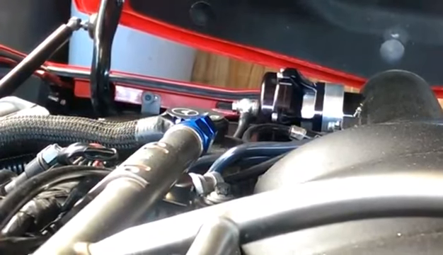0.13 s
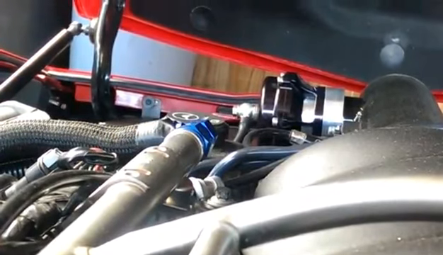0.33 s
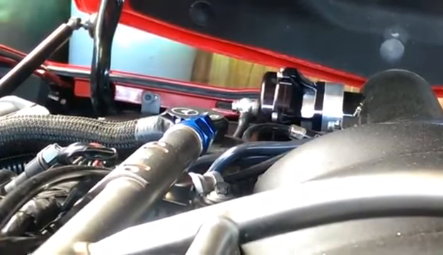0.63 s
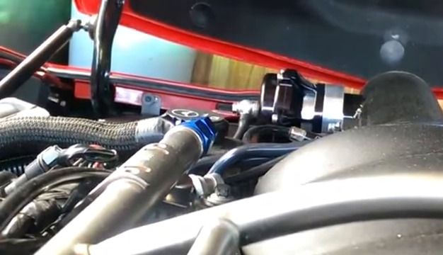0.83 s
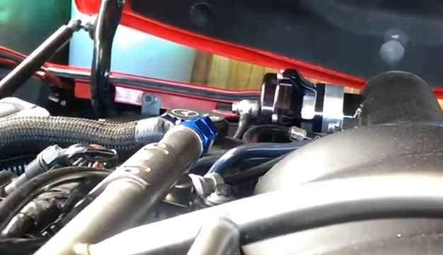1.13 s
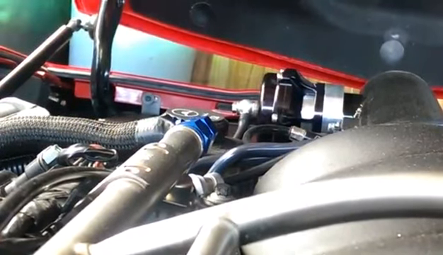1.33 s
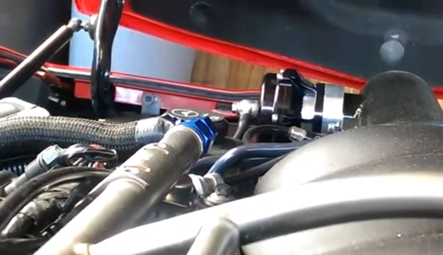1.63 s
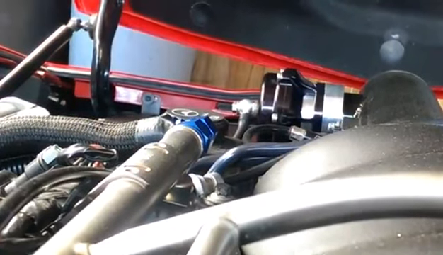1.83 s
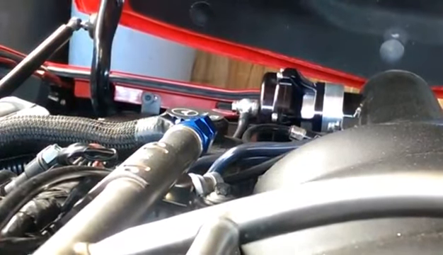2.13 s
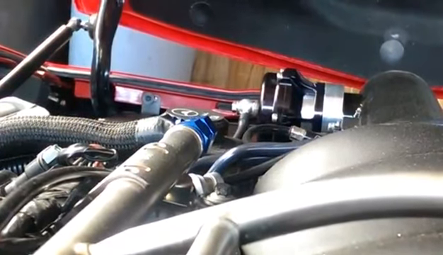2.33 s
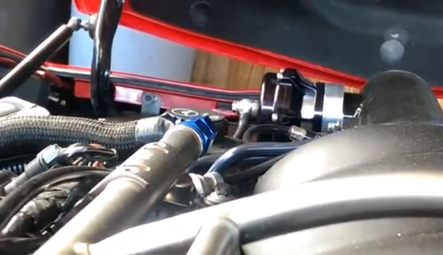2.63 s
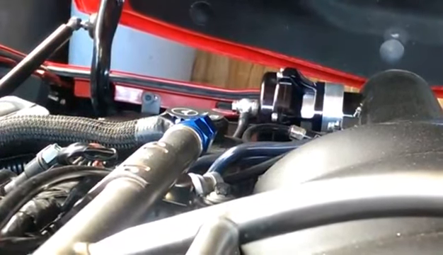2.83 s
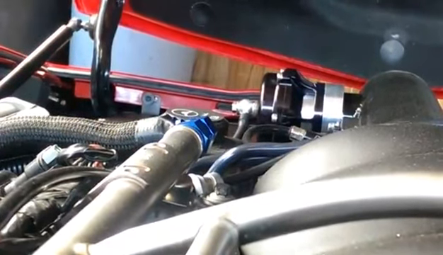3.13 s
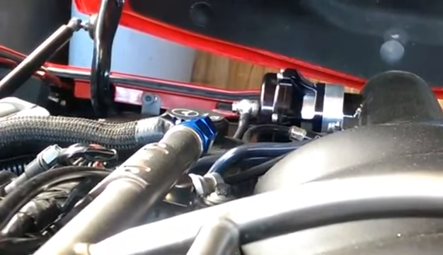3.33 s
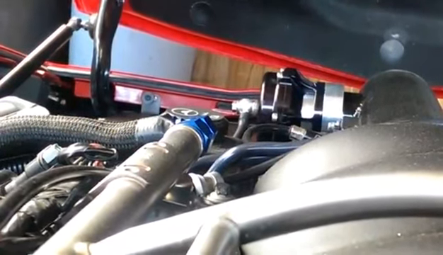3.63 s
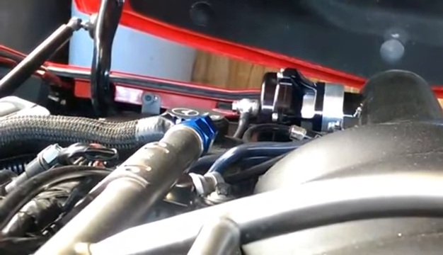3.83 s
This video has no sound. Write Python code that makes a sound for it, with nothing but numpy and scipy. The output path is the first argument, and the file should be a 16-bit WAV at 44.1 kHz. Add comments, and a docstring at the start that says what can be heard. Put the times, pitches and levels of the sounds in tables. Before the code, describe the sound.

Close stereo phone under a raised hood: car engine start-up. Quiet ticks and thuds, then the starter slams in, groaning in pulses with whir and squeal, before booming exhaust fires, sags and climbs, with short garage echo.

```python
"""A starter motor cranks under a raised hood: its gear groans as each compression slows it, and metal grinds.
The engine catches, stumbles, catches again and revs: firing pulses boom in the exhaust and ring its pipes.
A panel squeals near 2.9 kHz in noise and sine bursts, and struck modes make the knocks, jingle and relay click
before the crank. A stereo phone lies among the pipes, close to it all, in a quiet garage of noise and echo."""
import sys
import numpy as np
from scipy import signal
from scipy.fft import rfft, irfft
from scipy.io import wavfile
from scipy.ndimage import uniform_filter1d

SR = 44100
rng = np.random.default_rng(int(sys.argv[2]) if len(sys.argv) > 2 else 0)


def persist_wave(psi):
    """Save psi, clipped to +-1, as 16-bit WAV."""
    counts = np.round(np.clip(psi, -1, 1) * 32767).astype(np.int16)
    wavfile.write(sys.argv[1], SR, np.atleast_2d(counts).T)


N = 176400
T = np.arange(N) / SR
OVERTONE_CHATTER_DB = 3.5  # shared by the gear overtones and the whir


def undb(db):
    """Amplitude factor of a level in dB."""
    return 10 ** (np.asarray(db) / 20)


def unit(x):
    """Scale to an RMS of 1."""
    return x / np.sqrt(np.mean(x ** 2) + 1e-30)


def noise():
    """One channel of white noise."""
    return rng.standard_normal(N)


def curve(table, column):
    """One column drawn as straight lines over time, holding its end values."""
    points = np.array(table)
    return np.interp(T, points[:, 0], points[:, column])


def gate(table):
    """Fade in at the table's first time and out around its last."""
    fade_in = np.clip((T - table[0][0]) / 0.0067, 0, 1)
    fade_out = np.clip((table[-1][0] + .02 - T) / 0.023, 0, 1)
    return fade_in * fade_out


def shape(x, table, ends=True):
    """Filter by (pitch_hz, gain_db) points; ends closes the band outside them."""
    hz, points = np.fft.rfftfreq(N, 1 / SR) + 1, np.array(table)
    gain = undb(np.interp(np.log(hz), np.log(points[:, 0] + 1), points[:, 1]))
    if ends:
        gain = gain / (1 + (points[0, 0] / hz) ** 6) / (1 + (hz / points[-1, 0]) ** 6)
    return irfft(rfft(x) * gain, N)


def reso(x, hz, width_hz):
    """A single resonance, as of a struck or blown part."""
    return signal.lfilter(*signal.iirpeak(hz, hz / width_hz, fs=SR), x)


def modes_noise(x, modes):
    """Sum resonances of x from (pitch_hz, width_hz, level_db) rows."""
    return sum(undb(db) * unit(reso(x, hz, width)) for hz, width, db in modes)


def walk(rate):
    """Random levels held 1 / rate s and smoothed twice; spread near 1."""
    k = int(SR / rate)
    held = np.repeat(rng.standard_normal(N // k + 1), k)
    return 1.28 * uniform_filter1d(uniform_filter1d(held, k), k)[:N]


def grains(rate, spread_db):
    """Sparse random ticks of unequal size, rate per second."""
    ticks = (rng.random(N) < rate / SR) * noise()
    return ticks * undb(spread_db * np.minimum(rng.exponential(size=N), 2))


def ring(start_s, hz, t60):
    """A sine struck at start_s that falls 60 dB in t60 seconds."""
    u = np.maximum(T - start_s, 0)
    return np.sin(2 * np.pi * hz * u) * np.exp(-np.log(1000) * u / t60)


def modes_ring(start_s, modes):
    """Strike (pitch_hz, level_db, t60_s) rows together."""
    return sum(undb(db) * ring(start_s, hz, t60) for hz, db, t60 in modes)


def pan(x, db):
    """Place a source in stereo, left against right in dB; negative leans right."""
    return x * undb(np.array([[db], [-db]]) / 2)


# stereo width, side against mid: pitch_hz, gain_db
WIDTH_GAINS = [(60, -8), (200, -22), (700, -4), (1300, 1), (2400, -3), (8000, 0)]
# stereo balance, left against right: pitch_hz, gain_db
LEAN_GAINS = [(100, 0.5), (400, -2.5), (1300, -1), (4400, -5.5), (8000, -2.5), (13000, -0.5)]


def spread(make):
    """Mid and unrelated side versions of a noisy source, wide and leaning as the phone hears the bay."""
    mid, side = make(), shape(make(), WIDTH_GAINS, False)
    left_lean = [(hz, db / 2) for hz, db in LEAN_GAINS]
    right_lean = [(hz, -db) for hz, db in left_lean]
    return np.array([shape(mid + side, left_lean, False), shape(mid - side, right_lean, False)])


# span of the cranking shudder, first and last row: time_s
CRANK_SPAN = [(1.56,), (2.95,)]
# gear groans as a compression slows the crank:
# start_s, slowest_s, end_s, lowest_tooth_rate_hz, level_db, half_rate_level_db
GEAR_GROANS = [(1.55, 1.545, 1.615, 175, -33, -50), (1.81, 1.9, 1.91, 250, -33, -44),
               (2.04, 2.11, 2.17, 255, -42, -36), (2.21, 2.295, 2.375, 222, -26, -39),
               (2.485, 2.565, 2.62, 236, -26, -38), (2.71, 2.79, 2.79, 355, -30, -52),
               (2.785, 2.86, 2.885, 245, -31, -52)]
# overtones of the tooth rate from the second up, against the fundamental: level_db
MESH_OVERTONES = [-13, -13, -14, -18, -14, -20]
MESH_ROUGH = 0.22  # depth of the random swell
GROAN_BEND_HZ_S2, GROAN_EDGE_S = 11000, .025
RUMBLE_DB = -49  # centre of a wandering level
LURCH_S, LURCH_HZ, LURCH_DB, LURCH_T60_S = 1.705, 51, -33, 0.96


def starter():
    """Teeth groan at the mesh rate, dipping in compressions; alternate teeth add a half-rate line."""
    # low shudder of the car while it cranks
    out = undb(RUMBLE_DB + 3.7 * walk(17)) * unit(reso(noise(), 120, 85)) * gate(CRANK_SPAN)
    # the engine block rocks as the crank breaks loose
    out += undb(LURCH_DB) * ring(LURCH_S, LURCH_HZ, LURCH_T60_S) * (1 + 0.51 * walk(28.7))
    wobble, rough = 1 + 0.015 * walk(60), 1 + MESH_ROUGH * walk(70)
    chatter = [OVERTONE_CHATTER_DB * walk(35) for _ in MESH_OVERTONES]
    for start, slowest, end, lowest_hz, db, half_db in GEAR_GROANS:
        tooth_hz = lowest_hz + GROAN_BEND_HZ_S2 * np.clip(T - slowest, -.2, .2) ** 2
        turn = 2 * np.pi * np.cumsum(tooth_hz * wobble) / SR
        tone = np.sin(turn)
        for k, overtone_db in enumerate(MESH_OVERTONES):
            tone = tone + undb(overtone_db + chatter[k]) * np.sin((k + 2) * turn)
        env = np.clip(np.minimum(T - start, end - T) / GROAN_EDGE_S, 0, 1)
        teeth = undb(db) * tone + undb(half_db) * np.sin(turn / 2)
        out += np.sqrt(2) * env * rough * teeth
    return out


LINE_WOBBLE, LINE_CHATTER_DB = .018, 4.5  # pitch spread as a fraction, level spread


def glide(table, multiple=1):
    """A wavering, chattering tone along (time_s, pitch_hz, level_db) rows."""
    hz = multiple * curve(table, 1) * (1 + LINE_WOBBLE * walk(120))
    turn = 2 * np.pi * np.cumsum(hz) / SR
    level = undb(curve(table, 2) + LINE_CHATTER_DB * walk(70))
    return np.sqrt(2) * np.sin(turn) * level * gate(table)


# whir of the starter's armature, sagging under each compression: time_s, pitch_hz, level_db
WHIR_LINE = [(1.8, 1750, -48), (1.85, 1640, -39), (1.89, 1310, -36), (1.95, 1020, -35), (2.0, 950, -45),
             (2.12, 1600, -45), (2.16, 1530, -35), (2.21, 1400, -40), (2.28, 1290, -36), (2.38, 1340, -40),
             (2.44, 1640, -36), (2.54, 1440, -35), (2.62, 1320, -52), (2.72, 2050, -40), (2.8, 1600, -37),
             (2.88, 1300, -42)]
# tones of the whir: pitch_multiple, relative_level_db
WHIR_TONES = [(.5, -3.5), (.62, -6.5), (.8, -10.5), (1, -1), (1.2, -9)]


def starter_whir():
    """The armature sings several partials that follow one sagging pitch."""
    return sum(undb(db + OVERTONE_CHATTER_DB * walk(12)) * 1.2 * glide(WHIR_LINE, multiple)
               for multiple, db in WHIR_TONES)


# engine: time_s, firing_rate_hz, exhaust_db, pipe_ring_db, upper_pipe_ring_db
ENGINE_COURSE = [(2.955, 56.22, -36, -50, -50), (2.975, 57.2, -25, -60, -53),
                 (3.005, 57.85, -29.5, -32, -55), (3.04, 58.33, -9.5, -25, -49),
                 (3.07, 58.5, -26, -25.5, -48), (3.1, 61.27, -13.5, -28, -48), (3.156, 63.85, -7, -25, -31),
                 (3.195, 64.05, -15.5, -28, -39), (3.245, 64.2, -22.5, -35.5, -34),
                 (3.29, 63, -45, -25, -49), (3.364, 60.84, -24.5, -37, -31.5),
                 (3.42, 62.3, -21, -37.5, -34.5), (3.49, 62.28, -24, -27, -33),
                 (3.554, 59.24, -21, -42, -34), (3.585, 57.24, -16.5, -39, -52),
                 (3.628, 57.62, -11.5, -25.5, -41), (3.686, 61.55, -15, -32.5, -41),
                 (3.732, 71.34, -18.5, -23.5, -34.5), (3.782, 73.34, -12.5, -30, -33),
                 (3.824, 73.37, -19, -12.5, -40), (3.86, 75.16, -17, -31, -25), (3.9, 81.57, -15, -27, -30),
                 (3.934, 82.8, -17, -24, -33), (4.0, 83.84, -13, -22.5, -24)]
# exhaust resonances: pitch_hz, width_hz, relative_level_db
EXHAUST_MODES = [(360, 44, -19), (438, 38, -16), (107, 29, -10.5)]
# exhaust boom: multiple_of_firing_rate, relative_level_db
BOOM_ORDERS = [(1, 4), (1.5, -3), (2, -3.5), (2.5, -15.5), (3, -12.5), (4, -21), (5, -26)]
ORDER_WANDER_DB = 2.5  # at the firing rate; grows with the root of the multiple
FIRE_JITTER, FIRE_SCATTER_DB = .02, 7  # spread of firing rate (fraction) and of pulse size
PIPE_HZ, PIPE_WIDTH_HZ, PIPE_SCATTER = 245, 45, .7  # scatter: exponent evening the pulse sizes
UPPER_PIPE_HZ, UPPER_PIPE_WIDTH_HZ = 594, 32


def engine():
    """Uneven firing pulses boom in the exhaust and ring its pipes; also returns the cycle count."""
    rate = curve(ENGINE_COURSE, 1)
    cycles = np.cumsum(rate * (1 + FIRE_JITTER * walk(30))) / SR
    hits = np.flatnonzero(np.diff(np.floor(cycles)))
    pulses = np.zeros(N)
    pulses[hits] = undb(FIRE_SCATTER_DB * rng.standard_normal(N // 200)[:len(hits)])
    pulses /= np.sqrt(rate / 65)  # evens the power as firings crowd together
    boom = sum(undb(db) * unit(reso(reso(pulses, hz, width), hz, 2 * width))
               for hz, width, db in EXHAUST_MODES)
    for k, db in BOOM_ORDERS:
        level = undb(db + ORDER_WANDER_DB * np.sqrt(k) * walk(24.99))
        boom += level * np.cos(2 * np.pi * k * cycles)
    rough = pulses ** PIPE_SCATTER + 0.036 * noise()
    pipe = unit(reso(reso(rough, PIPE_HZ, PIPE_WIDTH_HZ), PIPE_HZ, 120))
    upper = unit(reso(reso(rough, UPPER_PIPE_HZ, UPPER_PIPE_WIDTH_HZ), UPPER_PIPE_HZ, 180))
    out = sum(x * undb(curve(ENGINE_COURSE, column)) for column, x in ((2, unit(boom)), (3, pipe), (4, upper)))
    return out * gate(ENGINE_COURSE), cycles


# whine that climbs with engine speed, one list per surge: time_s, pitch_hz, level_db
WHINE_SURGES = [
    [(3.06, 2200, -30), (3.085, 2700, -30), (3.12, 3050, -26), (3.14, 3450, -34.5), (3.17, 3660, -45)],
    [(3.62, 2950, -42), (3.665, 3220, -31), (3.715, 3430, -31), (3.76, 3560, -34), (3.81, 3780, -35),
     (3.85, 3920, -35), (3.88, 4090, -31), (3.93, 4240, -33), (3.99, 4480, -25)],
]


def engine_whine():
    """One climbing tone for each surge of the engine."""
    return sum(glide(surge) for surge in WHINE_SURGES)


# running gear: time_s, grind_db, upper_grind_db, air_hiss_db
RUN_LEVELS = [(1.52, -34, -26, -52), (1.54, -31, -29.5, -42), (1.59, -29, -36, -57),
              (1.64, -34.5, -39.5, -65), (1.83, -26, -30, -48), (1.99, -31, -35.5, -66),
              (2.14, -27, -27.5, -48.5), (2.32, -28.5, -31.5, -63), (2.42, -28.5, -29, -50.5),
              (2.5, -25.5, -27, -55), (2.54, -27.5, -32, -60), (2.68, -29, -32, -48.5),
              (2.73, -26, -27.5, -53), (2.79, -27.5, -29, -51), (2.96, -29.5, -27.5, -47),
              (3.03, -26, -25.5, -30), (3.16, -27.5, -32, -37.5), (3.3, -33.5, -38, -50.5),
              (3.5, -25, -30, -42.5), (3.59, -31, -33.5, -41), (4.0, -24.5, -26, -33.5)]
# colour of the grind: pitch_hz, gain_db
GRIND_COLOUR = [(150, -3), (240, 1.5), (600, -3), (1400, -5.5), (2000, -7), (3000, 0)]
# colour of the upper grind: pitch_hz, gain_db
UPPER_COLOUR = [(2600, -3.5), (3400, -3), (4200, 2.5), (5000, -2.5), (5500, -8), (8000, -20.5)]
# colour of the air hiss: pitch_hz, gain_db
AIR_COLOUR = [(6000, 0.5), (8500, -6.5), (12000, -1), (15600, -6)]
# resonances of the housing: pitch_hz, width_hz, relative_level_db
HOUSING_MODES = [(1000, 100, -4.5), (1460, 310, 14), (2900, 160, 9.5), (2017, 21, 4.5), (3524, 38, 8),
                 (4290, 51, 8), (4820, 77, 9)]
HOUSING_DB, GRAIN_RATE, GRAIN_DB, FLICKER_DB = -18, 2500, 1.5, 1  # rate in ticks per s
PUFF_DEPTH = 0.053


def grinding(cycles):
    """Ticks and noise grind in the housing and hiss as air, puffing at the firing rate."""
    puff = 1 + PUFF_DEPTH * gate(ENGINE_COURSE) * np.cos(2 * np.pi * cycles)

    def make():
        metal = unit(unit(grains(GRAIN_RATE, GRAIN_DB)) + noise())
        metal = metal + undb(HOUSING_DB) * unit(modes_noise(metal, HOUSING_MODES))
        bands = 0
        for column, colour in enumerate((GRIND_COLOUR, UPPER_COLOUR, AIR_COLOUR), 1):
            level = undb(curve(RUN_LEVELS, column) + FLICKER_DB * walk(25.02))
            bands = bands + unit(shape(metal, colour)) * level
        return bands * puff
    return spread(make) * gate(RUN_LEVELS)


# squeal of a sheet-metal panel: time_s, level_db
SQUEAL_LEVELS = [(1.53, -29.5), (1.575, -35), (1.6, -26), (1.64, -42), (1.97, -44), (1.985, -25),
                 (2.0, -59), (2.68, -34), (2.71, -20), (2.75, -40), (2.88, -40), (2.9, -21), (3.03, -22.5),
                 (3.05, -30), (3.11, -24), (3.15, -62), (3.25, -30.5), (3.33, -32.5), (3.39, -23),
                 (3.43, -25), (3.47, -20.5), (3.57, -23), (3.65, -21), (3.7, -29), (4.0, -41)]
SQUEAL_HZ, SQUEAL_WIDTH_HZ, SQUEAL_CHATTER_DB, SQUEAL_PAN_DB = 2928, 55, 0, -9.5


def panel_squeal():
    """Noise drives a narrow panel resonance in bursts, partly shared by both channels."""
    narrow = reso(rng.standard_normal((2, N)), SQUEAL_HZ, SQUEAL_WIDTH_HZ)
    kicks = unit(reso(narrow, SQUEAL_HZ, 520))
    level = undb(curve(SQUEAL_LEVELS, 1) + SQUEAL_CHATTER_DB * walk(60))
    squeal = unit(kicks[0] + 0.4 * kicks) * level
    return pan(squeal, SQUEAL_PAN_DB) * gate(RUN_LEVELS)


# short metallic pings, and bursts of the 2.9 kHz squeal: peak_s, pitch_hz, level_db
PINGS_AND_SQUEAL_BURSTS = [(1.588, 2840, -23.5), (1.604, 2900, -21.5), (2.218, 4180, -22.5),
                           (2.851, 5010, -17), (2.907, 1010, -23), (2.924, 2860, -10.5),
                           (3.018, 2900, -12.5), (3.07, 5040, -19.5), (3.097, 2933, -11.5),
                           (3.504, 2905, -11.5), (3.519, 2906, -16.5), (3.555, 2834, -8.5),
                           (3.888, 4170, -19)]
PING_S = 0.0061  # from the peak to 1/e


def pings_and_squeal_bursts():
    """Brief sines with a bell-shaped level and a trembling phase."""
    return sum(undb(db) * np.exp(-((T - s) / PING_S) ** 2) * np.sin(2 * np.pi * hz * T + 0.49 * walk(300))
               for s, hz, db in PINGS_AND_SQUEAL_BURSTS)


# ringing parts as the starter slams in: pitch_hz, level_db, t60_s
SLAM_RING = [(1037, 4.5, 0.029), (2590, 1, 0.039), (4170, 5.5, 0.035), (4920, -15, .02)]
SLAM_S, SLAM_DECAY_S, SLAM_DB = 1.5245, .007, -18


def starter_slam():
    """The starter slams in: struck modes under a fast-fading burst of noise."""
    fade = (T > SLAM_S) * np.exp(-np.maximum(T - SLAM_S, 0) / SLAM_DECAY_S)
    burst = fade * unit(shape(noise(), GRIND_COLOUR + UPPER_COLOUR[2:]))
    return undb(SLAM_DB) * (0.7 * modes_ring(SLAM_S, SLAM_RING) + burst)


# ringing of the relay: pitch_hz, relative_level_db, t60_s
RELAY_RING = [(4450, 0, .03), (4850, -4, .015), (3800, -5, .015), (2700, -6, .02)]
RELAY_S, RELAY_DB = 1.4555, -37


def relay():
    """The relay clicks: short high modes with a rough level."""
    return undb(RELAY_DB) * sum(undb(db) * ring(RELAY_S, hz, t60) * (1 + walk(900))
                                for hz, db, t60 in RELAY_RING)


# small clicks and knocks: start_s, relative_level_db, pitch_hz
SMALL_CLICKS = [(0.188, -37.5, 3760), (0.351, -39, 2510), (0.393, -32.5, 4400), (0.511, -39.5, 4270),
                (0.58, -35, 3600), (0.63, -30.5, 3140), (0.666, -19, 2420), (0.797, -40, 4600),
                (0.834, -34.5, 2670), (0.885, -24.5, 924), (1.294, -45, 2900), (1.513, -15.5, 2950)]
CLICK_RISE_S, CLICK_T60_S, CLICK_TAIL_DB, CLICK_TAIL_S = .0015, 0.15, -13, 0.095
CLICK_WIDTH, CLICK_LOWER = .06, 0.723  # fractions of the pitch: bandwidth, second resonance
CLICK_CRACK_DB, CLICK_PAN_DB = -5, -2.5


def clicks():
    """Short cracks of noise through two resonances, with a slower tail."""
    out = np.zeros((2, N))
    for start, db, hz in SMALL_CLICKS:
        u = np.maximum(T - start, 0)
        fall = np.exp(-np.log(1000) * u / CLICK_T60_S) + undb(CLICK_TAIL_DB) * np.exp(-u / CLICK_TAIL_S)
        env = (1 - np.exp(-u / CLICK_RISE_S)) * fall
        wide = shape(rng.standard_normal((2, N)), [(500, 3.2), (5200, 2)])
        coloured = reso(wide, hz, hz * CLICK_WIDTH) + reso(wide, hz * CLICK_LOWER, hz * CLICK_WIDTH)
        crack = unit(coloured) + undb(CLICK_CRACK_DB) * unit(wide)
        # one part common to both channels, one part of each channel's own
        out += pan(unit(crack[0] + 1.5 * crack) * env * undb(db - 16), CLICK_PAN_DB)
    return out


# dull thuds of the bodywork: start_s, level_db, upper_mode_share
BODY_THUDS = [(.004, -31, 0.19), (.112, -30, 0.17), (0.138, -30.5, 0.19), (0.396, -35.5, 0.56),
              (0.524, -43, 0.6), (0.578, -40, .3), (0.647, -32, 0.71), (0.896, -39, 0.67),
              (0.971, -38, 0.54), (1.46, -42.5, 1), (1.556, -33, 0.8)]
# modes of the bodywork: pitch_hz, relative_level_db, t60_s
BODY_MODES = [(65, -13, 0.35), (125.2, 5.5, 0.26), (221, 6, 0.099), (327, 5.5, 0.035), (435, -5, 0.27),
              (789, -5.5, 0.084), (985, -12.5, 0.12)]


def thuds():
    """Soft knocks ring the body modes; the share tips them above or below 150 Hz."""
    out = np.zeros(N)
    for start, db, upper in BODY_THUDS:
        soft = 1 - np.exp(-np.maximum(T - start, 0) / 0.001)
        high, low = np.clip(upper, 0, 1), 1 - np.clip(upper, 0, .95)
        body = sum(undb(d) * ring(start, hz, t60) * (high if hz > 150 else low) for hz, d, t60 in BODY_MODES)
        out += undb(db) * soft * body
    return out


# ringing of the small metal parts: pitch_hz, width_hz, relative_level_db
JINGLE_RING = [(2420, 150, -3), (2680, 90, -6), (3180, 150, -3), (4040, 60, -8), (4740, 110, 0),
               (5310, 70, -11), (5950, 60, -3), (6980, 100, -15)]
# colour of the jingle's hiss: pitch_hz, gain_db
JINGLE_COLOUR = [(1700, -20), (2200, 1.5), (3000, 1), (6000, -7.5), (7000, -21), (15500, -13)]
JINGLE_S, JINGLE_RISE_S, JINGLE_DECAY_S, JINGLE_TAIL_S = .951, 0.049, 0.023, 0.097
JINGLE_DB, JINGLE_TAIL_DB, JINGLE_HISS_DB, JINGLE_RATE = -39, -4.5, 0, 1800  # rate in ticks per s


def jingle():
    """A quick shake of small metal parts: many ticks ring their modes over a bright hiss."""
    u = np.maximum(T - JINGLE_S, 0)
    fall = np.maximum(u - JINGLE_RISE_S, 0)
    rise = (T > JINGLE_S) * np.minimum(0.24 + u / JINGLE_RISE_S, 1)
    shake = rise * np.exp(-fall / JINGLE_DECAY_S)
    tail = rise * undb(JINGLE_TAIL_DB) * np.exp(-fall / JINGLE_TAIL_S)

    def make():
        ringing = unit(modes_noise(grains(JINGLE_RATE, 2.7), JINGLE_RING))
        hiss = undb(JINGLE_HISS_DB) * unit(shape(noise(), JINGLE_COLOUR))
        return ringing * (shake + tail / 2) + hiss * (shake + tail)
    return spread(make) * undb(JINGLE_DB)


ROOM_T60_S, ROOM_DB = 0.32, -10.5


def garage_echo(near):
    """The garage answers with a decaying noise tail, starting 6 ms late and darker on top."""
    u = T[:SR // 2]
    tail = rng.standard_normal((2, len(u))) * np.exp(-np.log(1000) * u / ROOM_T60_S) * (u > .006)
    padded = np.pad(tail, ((0, 0), (0, N - len(u))))
    tail = shape(padded, [(150, -15), (500, 0.0), (5000, -6.0), (12000, -14.5)], False)[:, :len(u)]
    tail = tail / np.sqrt(np.sum(tail ** 2) / 2)
    return undb(ROOM_DB) * signal.fftconvolve(near, tail, axes=1)[:, :N]


# colour of the quiet garage: pitch_hz, gain_db
GARAGE_COLOUR = [(30, -7), (130, 5.5), (300, -5.5), (420, -4.5), (1100, -18), (4800, -26.5), (6200, -35),
                 (15500, -35.5)]
GARAGE_DB = -49  # centre of a wandering level


def garage_air():
    """Mostly low, slowly wavering noise around the phone."""
    return spread(lambda: unit(shape(noise(), GARAGE_COLOUR)) * undb(GARAGE_DB + 2 * walk(9.08)))


def scene():
    """Place the sources around the phone, then add the garage's echo and air."""
    exhaust, cycles = engine()
    near = pan(starter(), -2.2) + pan(starter_whir(), -6.0)
    near += pan(exhaust, -0.77) + pan(engine_whine(), -7)
    near += grinding(cycles) + panel_squeal() + pan(pings_and_squeal_bursts(), -11.5)
    near += pan(starter_slam(), -8.5) + pan(relay(), CLICK_PAN_DB)
    near += clicks() + thuds() + jingle()
    return near + garage_echo(near) + garage_air()


TOP_HZ = 15650


def record(dry):
    """The phone's microphones thin the deepest bass, clip just under full scale and cut the top."""
    thin = signal.sosfilt(signal.butter(2, 38, "high", fs=SR, output="sos"), dry)
    top_cut = signal.ellip(12, .2, 90, TOP_HZ, fs=SR, output="sos")
    return signal.sosfilt(top_cut, np.clip(thin, -.95, .95))


dry = scene()
out = record(dry)
persist_wave(out)
```